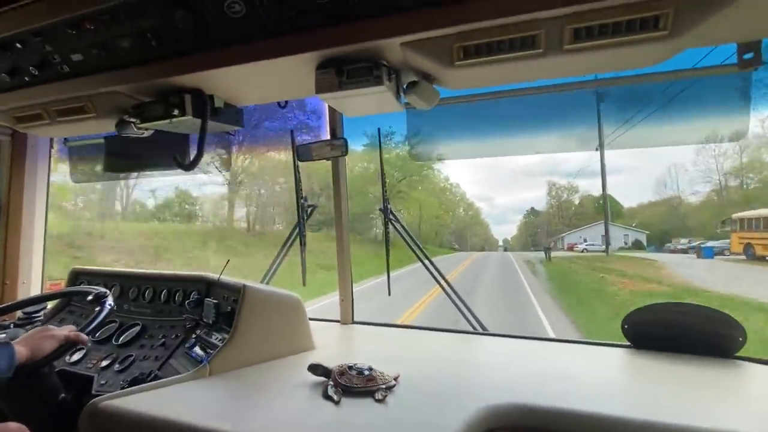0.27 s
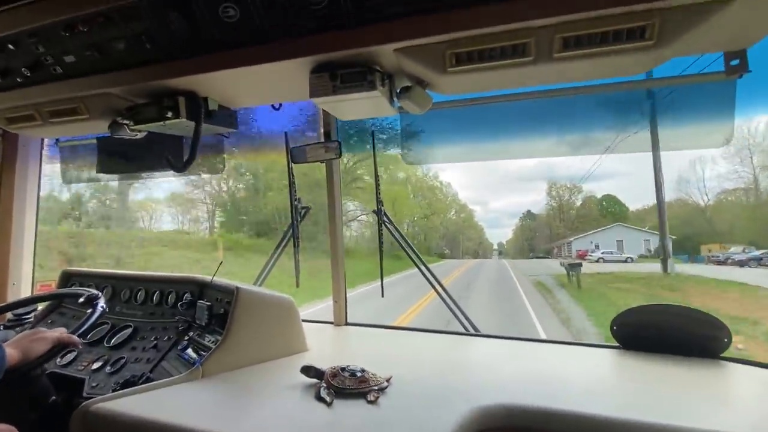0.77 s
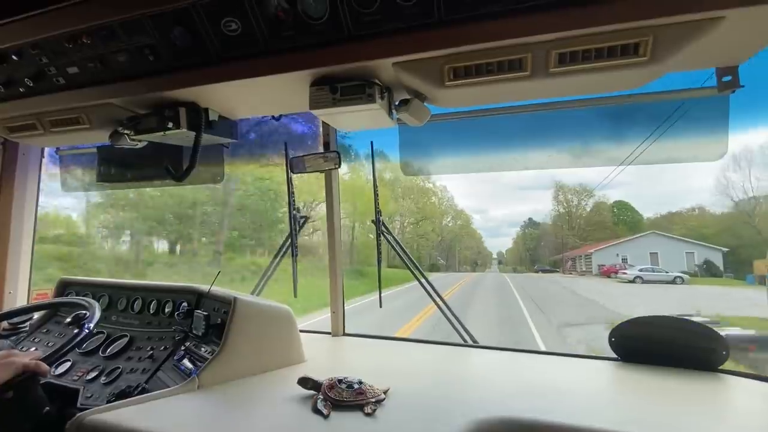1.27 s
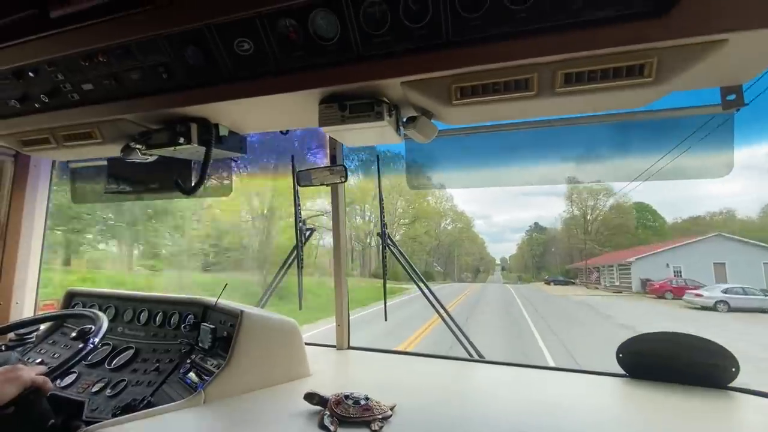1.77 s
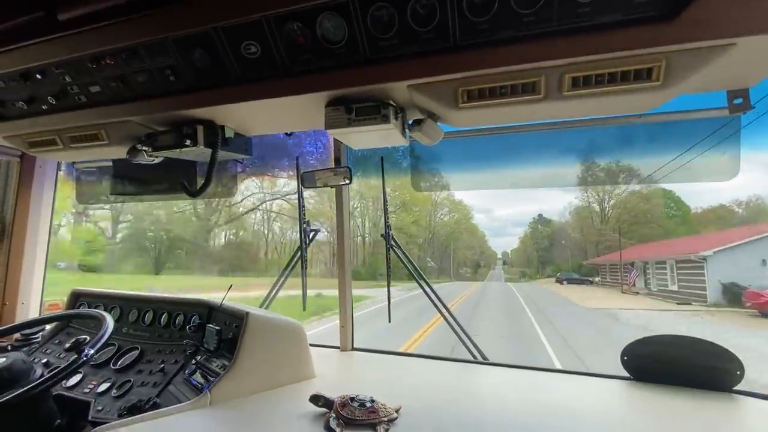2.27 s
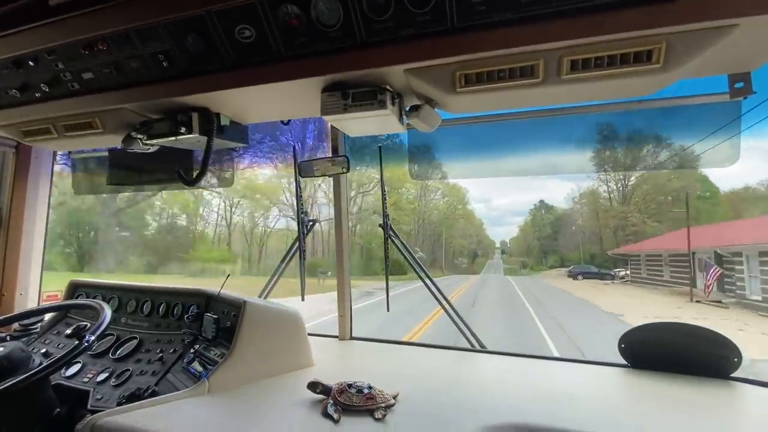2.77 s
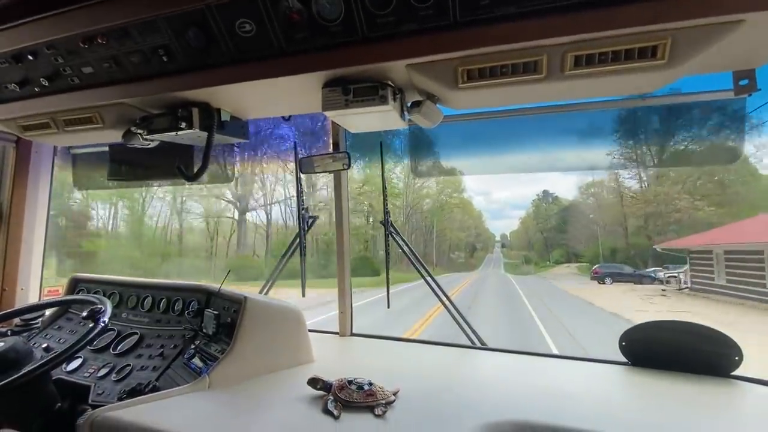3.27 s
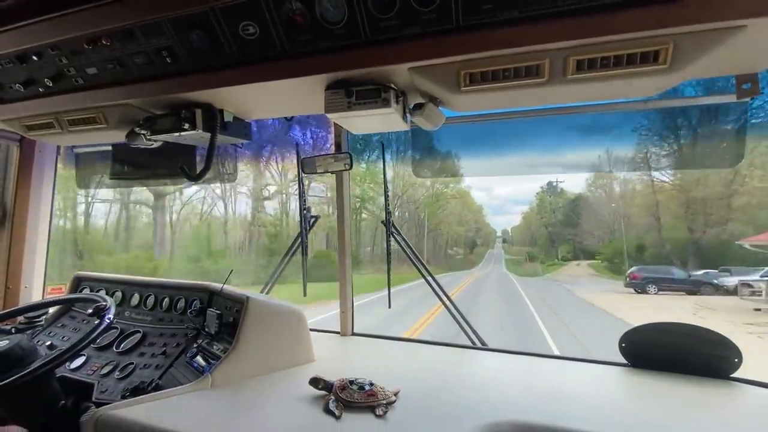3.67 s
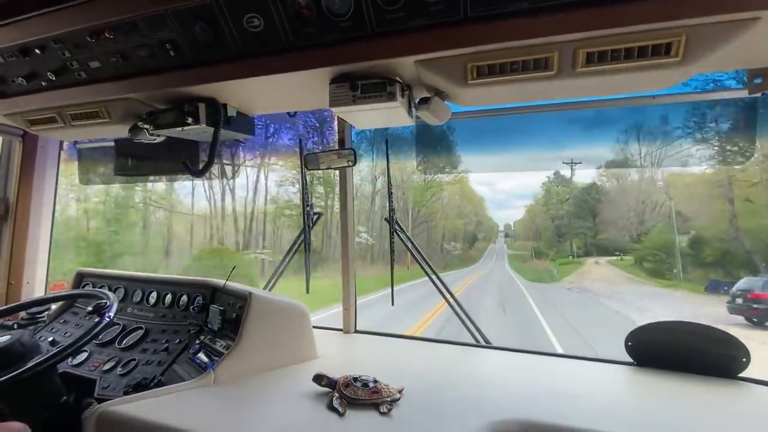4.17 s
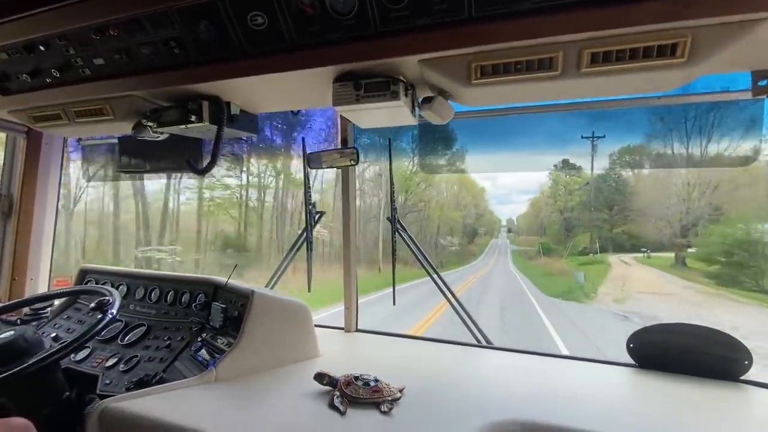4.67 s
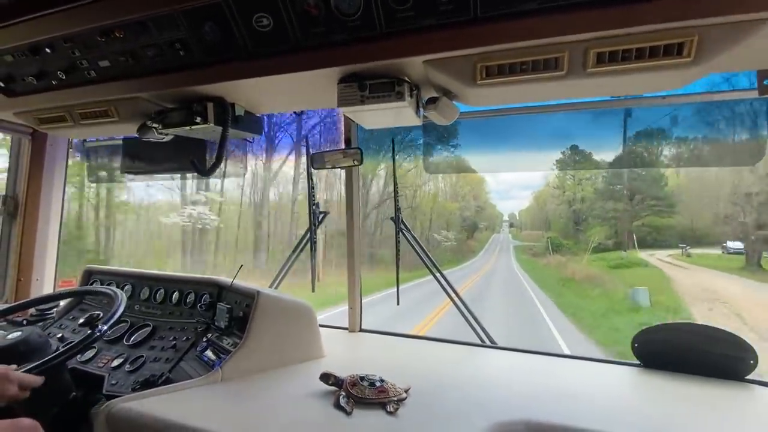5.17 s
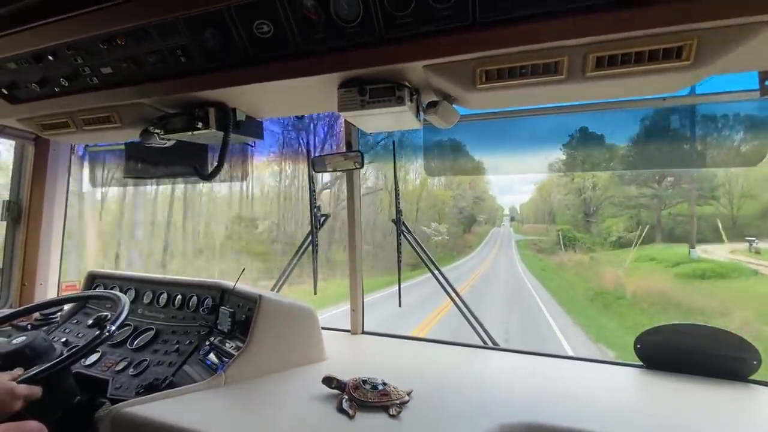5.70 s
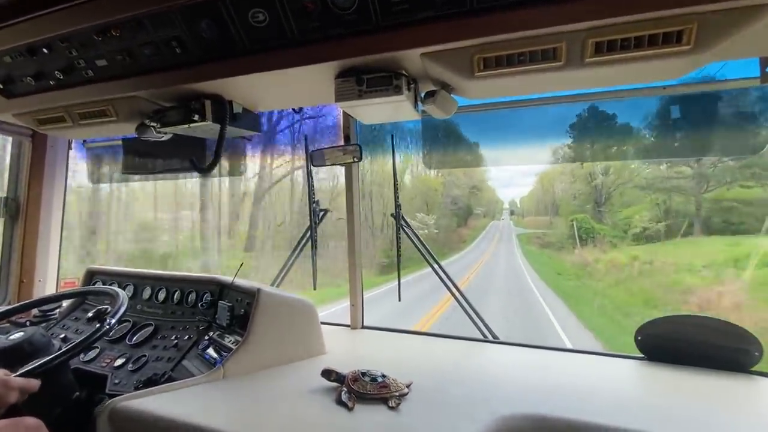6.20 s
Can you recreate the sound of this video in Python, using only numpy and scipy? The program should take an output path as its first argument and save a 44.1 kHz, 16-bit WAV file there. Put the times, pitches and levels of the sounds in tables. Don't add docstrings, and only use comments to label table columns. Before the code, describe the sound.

Heard from a single microphone in a coach's cab, a big diesel far behind drones low and nearly steady. Irregular road shocks boom through the body and floor rumble fills the space. Close by, wind hisses at the windshield while loose trim buzzes, ticks and rattles. Panels knock throughout, tiny rubber squeaks come mostly mid-way, a cluster of dull dashboard thuds lands past four and a half seconds, and heavier bumps come near the end.

```python
import sys
import numpy as np
from scipy import signal
from scipy.fft import rfft, irfft
from scipy.io import wavfile
from scipy.ndimage import uniform_filter1d

SR = 44100
rng = np.random.default_rng(int(sys.argv[2]) if len(sys.argv) > 2 else 0)


def wav_record(signal):
    frames = np.transpose(np.atleast_2d(signal))
    bounded = np.clip(frames, -1, 1)
    quanta = np.round(bounded * 32767).astype(np.int16)
    wavfile.write(sys.argv[1], SR, quanta)


def level_to_linear(level):
    exponent = np.asarray(level, float) / 20
    return 10 ** exponent


N = 284004
TIME = np.arange(N) / SR

# time_s, firing_hz, firing_rms_db
ENGINE = [(0.0, 114.9, -26.5), (0.45, 113.8, -27.5), (.7, 113.7, -22.5), (.93, 112.6, -23),
          (1.1, 112.2, -20.5), (1.5, 111, -20.5), (2.0, 110, -21), (2.9, 109, -22.5), (3.4, 108.4, -24.5),
          (3.55, 108.1, -30), (3.75, 109.4, -19.5), (4.0, 109, -24.5), (4.5, 109.5, -26.5),
          (5.1, 109.4, -23.5), (5.6, 110.7, -30), (5.75, 110.9, -25.5), (6.0, 111.1, -24.5),
          (6.44, 111.7, -23)]
# turns_per_crank_turn, rms_db at mean load, gain_db per dB of load,
# loss_db per squared Hz off the frame resonance
MAIN_ORDERS = [(5, -36.5, -0.1, -0.1), (10, -38.5, 0.16, 0.3), (3, -32, 0, 0.5)]
# turns_per_crank_turn, rms_db
WEAK_ORDERS = [(6, -45), (7, -47), (8, -45), (13, -51), (15, -58), (17, -62), (20, -54), (22.7, -62)]
MEAN_LOAD_DB, FRAME_FIRING_HZ = -24, 110

# centre_s, rms_db, half_length_s, ring_hz
SHOCKS = [(0.05, -25, .07, 65.9), (.27, -24.5, 0.092, 65.5), (.45, -27, 0.056, 70.4), (.68, -36, .08, 69.4),
          (.97, -26, 0.056, 72.2), (1.08, -22, 0.046, 74.35), (1.25, -22, .06, 73.5),
          (1.42, -26, .06, 71.8), (1.52, -23, 0.037, 69.7), (1.63, -21, 0.05, 73.8),
          (1.85, -23, 0.077, 71.7), (2.0, -26, 0.064, 78), (2.15, -26, 0.061, 74.05),
          (2.42, -20, 0.052, 70.2), (2.56, -24.5, 0.062, 74.15), (2.68, -27, .04, 70),
          (2.79, -23, 0.05, 68), (2.96, -22, 0.037, 69.9), (3.05, -21, 0.053, 69),
          (3.3, -21.5, 0.052, 68.6), (3.43, -23.5, .05, 70), (3.56, -36, .04, 68),
          (3.84, -22, 0.041, 72.26), (3.98, -27, .06, 66), (4.13, -25, 0.072, 67), (4.35, -24, .05, 71),
          (4.55, -27, .05, 72.7), (4.68, -24, .05, 66), (4.8, -27.5, .05, 67.6), (4.93, -28, .05, 70.5),
          (5.06, -23, 0.059, 68), (5.18, -30, 0.043, 68), (5.33, -31, .05, 71.8), (5.57, -16, .06, 69.2),
          (5.7, -23, .04, 74), (5.85, -26, .06, 69.94), (5.98, -27, .04, 72.14), (6.1, -22, 0.066, 70.9),
          (6.2, -26, .04, 72.03), (6.42, -18, 0.049, 72)]
# frequency_hz, density_db per Hz
BODY_HUMP = [(30, -24), (50, -11.5), (60, 1.5), (70, -9.5), (84, -5), (100, -2.5), (130, -63)]
# centre_s, rms_db, half_length_s, ring_hz
SWELLS = [(0.603, -44, .08, 329), (1.51, -31, 0.056, 272), (2.9, -37, 0.16, 267.2),
          (3.302, -31.5, 0.067, 168), (3.37, -32.5, 0.053, 215.2), (3.8, -38.5, 0.085, 270),
          (4.499, -34.5, .07, 212), (5.301, -31.5, 0.067, 221.7), (5.503, -34, 0.0793, 189.4),
          (5.72, -31.5, 0.11, 200), (6.149, -41, .07, 274.7), (6.267, -32, 0.083, 212), (.8, -40, .1, 200),
          (2.0, -27, .06, 86), (3.3, -44.5, 0.17, 500), (4.76, -37.5, 0.15, 270), (5.363, -23, .05, 84),
          (6.28, -18.5, 0.033, 83)]

# start_s, peak_db, ring_hz
KNOCKS = [(0.0307, -30, 1340), (0.1017, -43, 1510), (0.125, -40, 1170), (0.234, -29, 1220),
          (0.4464, -38, 1300), (1.2212, -28, 1110), (1.43, -34, 1173), (1.4731, -37, 1135),
          (2.1199, -34, 1276), (2.5235, -35, 1697), (2.686, -25.5, 2007), (2.863, -46, 1694),
          (3.6454, -31, 1405), (4.2407, -37, 1180), (4.521, -33, 1640), (5.3843, -24.5, 2040),
          (5.492, -26, 1760), (5.5686, -35, 1597), (5.678, -29, 2145), (5.881, -30, 1630),
          (6.1417, -35, 1437), (6.2106, -28, 1119)]
# start_s, peak_db, ring_hz
TAPS = [(0.1306, -28, 3110), (0.3834, -33, 3240), (0.5364, -29, 3360), (0.6402, -29, 2410),
        (0.7721, -29, 3070), (0.8579, -37, 3030), (0.9542, -38, 2670), (1.0276, -35, 3490),
        (1.2324, -29, 3100), (1.6661, -33, 3610), (1.9714, -43, 2750), (2.2109, -34, 2820),
        (2.2843, -35, 3090), (2.361, -28, 3150), (2.44, -29, 3170), (2.5212, -26.5, 2790),
        (2.7337, -29, 2833), (2.804, -27.5, 2820), (2.8773, -30.5, 3100), (3.468, -32, 3080),
        (3.5428, -40, 3152), (3.619, -36, 2790), (3.8374, -33, 2900), (4.364, -37, 3600),
        (4.4513, -38, 2620), (4.7249, -29, 2790), (4.804, -26, 2813), (4.8781, -29, 2880),
        (4.9589, -34, 3170), (5.037, -34, 2980), (5.2025, -31, 2400), (5.4179, -30, 2810),
        (5.489, -25, 3060), (5.5448, -32, 3090), (6.0614, -35, 2480), (6.1402, -34, 3015),
        (6.216, -28, 2730), (6.352, -31, 3036)]
# start_s, peak_db, ring_hz, t60_s
THUDS = [
    (1.29, -31, 1296, 0.1),
    (2.38, -35, 1106, .1),
    (4.62, -26, 450, .06),
    (4.65, -23, 200, .1),
    (4.703, -19, 150, .1),
    (4.618, -28, 805, .06),
    (4.645, -29, 800, .05),
    (4.68, -23, 383, 0.06),
    (4.681, -26, 800, .06),
]

# start_s, chatter_rms_db, chatter_length_s, click_db
TICKS = [(0.121, -48, .013, -42), (0.295, -46, .012, -39), (0.376, -46, 0.011, -39),
         (0.578, -49, .021, -44), (0.606, -47, .012, -37), (0.638, -48, .024, -37),
         (0.729, -48.5, .014, -40), (1.087, -49, .005, -36), (1.225, -43, 0.018, -36),
         (1.34, -43, 0.025, -36), (1.657, -48, 0.014, -40), (1.799, -48, 0.011, -40),
         (1.87, -49, 0.027, -45), (2.385, -50, .01, -42), (2.686, -50, 0.016, -43),
         (3.841, -47.5, 0.026, -39), (3.885, -49, 0.0057, -32), (4.056, -50.5, 0.015, -40),
         (4.079, -53, .006, -35), (4.241, -45.5, .01, -32), (4.597, -46, .022, -38),
         (4.63, -46, 0.021, -38), (4.657, -46.5, 0.022, -40), (4.694, -48, .019, -42),
         (5.268, -46, 0.027, -38), (5.371, -46, .028, -38), (5.736, -48, 0.011, -34),
         (5.88, -48, 0.023, -38), (6.205, -48, 0.027, -27), (6.261, -50, 0.02, -44),
         (5.288, -52, .006, -36), (5.914, -50, .006, -35), (2.52, -49, .014, -39), (2.594, -50, .007, -38),
         (5.2, -50, .012, -41), (4.855, -50, .011, -42)]
# start_s, peak_db, chatter_length_s
RATTLES = [(0.034, -31.5, 0.008), (0.0837, -39, 0.008), (0.158, -36, 0.008), (0.185, -32, 0.0067),
           (0.2139, -34, 0.008), (0.2344, -33, 0.008), (0.25, -35, 0.008), (0.2718, -33, 0.008),
           (0.5182, -38, 0.008), (0.6894, -36, 0.008), (0.7734, -37, 0.0073), (1.02, -45, 0.008),
           (1.413, -41, 0.008), (1.4426, -38, 0.008), (1.6067, -35, 0.0075), (1.7, -36, 0.008),
           (1.77, -37, 0.008), (2.216, -38, 0.008), (2.3117, -34, 0.0087), (2.368, -34, 0.008),
           (2.44, -37, 0.008), (2.4902, -39, 0.008), (2.613, -45, 0.0087), (2.7262, -36, 0.008),
           (2.808, -37, 0.0081), (2.9744, -40, 0.0088), (3.2301, -39, 0.0084), (3.2734, -40, 0.008),
           (3.343, -36, 0.008), (3.384, -36, 0.0086), (3.3996, -40, 0.008), (3.4494, -42, 0.008),
           (3.5952, -37, 0.0074), (3.6174, -36, 0.008), (3.6706, -35, 0.008), (3.7973, -39, 0.0074),
           (3.909, -39, 0.008), (3.999, -49, 0.008), (4.1187, -37, 0.0085), (4.1315, -43, 0.008),
           (4.316, -36, 0.0074), (4.3454, -38, 0.008), (4.471, -38, 0.0081), (4.492, -37, 0.0074),
           (4.579, -35, 0.008), (4.7394, -34, 0.008), (4.8084, -39, 0.008), (4.9064, -42, 0.0074),
           (4.9554, -39, 0.008), (5.356, -40, 0.0072), (5.409, -32, 0.008), (5.436, -35, 0.008),
           (5.4915, -35, 0.0083), (5.6516, -37, 0.008), (5.8207, -33, 0.008), (6.0864, -43, 0.0077),
           (6.139, -37, 0.008), (6.3804, -35, 0.0078)]
# frequency_hz, level_db, t60_s
TRIM_MODES = [(7150, -3, .07), (8100, -6, .05), (8600, -8, .05), (9700, -7, .05), (10700, -8, .05),
              (12500, -4, .06), (13650, -3, .05), (14200, -7, .04)]
# frequency_hz, gain_db
TICK_COLOUR = [(1200, -30), (2500, -6), (5000, -1), (7500, -1), (11000, -2), (14000, 1),
               (14900, -3), (15400, -9), (16500, -20)]

# start_s, length_s, pitch_hz, rms_db, octave_rms_db
SQUEAKS = [
    (2.805, 0.035, 5370, -51, -59),
    (3.174, 0.036, 5370, -53, -53),
    (3.215, 0.018, 5380, -62, -61),
    (3.342, 0.0462, 5310, -46, -51),
    (2.41, 0.035, 5370, -52, -62),
    (4.375, .02, 5300, -60, -58),
    (4.215, 0.023, 5370, -53, -59),
    (5.454, 0.0293, 5260, -58, -57.5),
    (5.535, 0.024, 5280, -56, -56),
    (6.234, 0.023, 5320, -56, -58),
]

# time_s, wind_rms_db
RIDE = [(0.0, -33), (0.05, -37), (0.2, -36), (1.92, -37.5), (2.73, -37), (2.92, -38.5), (4.46, -37),
        (4.55, -38.5), (4.68, -35), (4.75, -36.5), (6.13, -36), (6.3, -33.5), (6.33, -36.5), (6.44, -35)]
MEAN_RIDE_DB = -38
# frequency_hz, density_db per Hz
RUMBLE = [(22, -46), (35, -36), (55, -3.5), (75, -1.5), (110, 0.5), (150, -4.5), (215, -5.5), (250, -7),
          (330, -10.5), (450, -16.5), (700, -26.5), (1100, -31.5), (2000, -34.5)]
# frequency_hz, width_hz, level_db
FLOOR_MODES = [(117.2, 3.3, -1.5), (181.4, 14, -6), (197.9, 3.3, 1.5), (213.2, 4.9, -3),
               (270.8, 10.5, -4.5), (312.8, 9.2, -4), (358, 7.5, -12.5), (418, 11, -18), (478, 6.9, -13.5),
               (537, 11, -13.5), (629, 19, -18)]
# frequency_hz, density_db per Hz
WIND = [(290, -15), (500, -3), (668, -5), (1140, -7), (1260, -8.5), (1750, -7.5), (2630, -9.5), (3720, -9),
        (4860, -14), (8000, -35.5), (10400, -52), (17600, -120)]
# frequency_hz, density_db per Hz
BUZZ = [(3500, -7.5), (5500, -0.5), (7800, -12.5), (10000, -9.5), (12000, -8), (13800, -8.5), (14700, -7.5),
        (15200, -12), (15600, -18), (16000, -22)]


def unit(x):
    return x / np.sqrt(np.mean(x ** 2))


def columns(table):
    s, *values = np.transpose(table)
    return [np.interp(TIME, s, v) for v in values]


def walk(rate):
    k = int(SR / rate)
    held = np.repeat(rng.standard_normal(N // k + 1), k)[:N]
    return unit(uniform_filter1d(uniform_filter1d(held, k), k))


def tone(hz):
    return np.sqrt(2) * np.sin(2 * np.pi * np.cumsum(hz) / SR)


def coloured(x, points):
    hz, db = np.transpose(points)
    f = np.arange(N // 2 + 1) * SR / N + 1
    gain_db = np.interp(np.log(f), np.log(hz), db, left=-120, right=-120)
    return irfft(rfft(x) * level_to_linear(gain_db), N)


def patchy(points, lo_hz, hi_hz, shared_db, own_db, rate):
    spectrum = rfft(coloured(rng.standard_normal(N), points))
    octave = np.log2(np.arange(N // 2 + 1) * SR / N + 1)
    shared = shared_db * walk(rate)
    out = 0
    for centre in np.arange(np.log2(lo_hz), np.log2(hi_hz), .5):
        band = irfft(spectrum * np.clip(1 - 2 * abs(octave - centre), 0, 1), N)
        out = out + band * level_to_linear(shared + own_db * walk(rate))
    return unit(out)


def resonant(x, modes):
    f = np.arange(N // 2 + 1) * SR / N
    gain = sum(level_to_linear(db) / (1 + ((f - hz) / width) ** 2) for hz, width, db in modes)
    return unit(irfft(rfft(x) * gain, N))


def ring(t, hz, t60):
    return np.sin(2 * np.pi * hz * t) * level_to_linear(-60 * t / t60)


def add(out, s, sound):
    i = int(s * SR)
    out[i:i + len(sound)] += sound[:N - i]


def engine():
    firing_hz, firing_db = columns(ENGINE)
    crank = 2 * np.pi * np.cumsum(firing_hz) / SR / 4
    load = firing_db - MEAN_LOAD_DB
    off_resonance = firing_hz - FRAME_FIRING_HZ
    orders = [(4, firing_db, 1.0)]
    for order, db, per_db, per_hz in MAIN_ORDERS:
        orders.append((order, db + per_db * load - per_hz * off_resonance ** 2, 1.8))
    orders += [(order, db, 1.8) for order, db in WEAK_ORDERS]
    out = 0
    for order, db, waver_db in orders:
        level = level_to_linear(db + waver_db * walk(11))
        out = out + level * np.sin(order * crank + rng.uniform(0, 2 * np.pi) + .2 * walk(7))
    return np.sqrt(2) * out


def body_boom():
    power = level_to_linear(2 * -37)
    for s, db, half, _ in SHOCKS:
        power = power + level_to_linear(2 * db) * np.exp(-((TIME - s) / half) ** 2)
    boom_db = 10 * np.log10(power)
    ring_hz = columns(SHOCKS)[-1]
    mode = tone(ring_hz + 0.78 * walk(10)) * level_to_linear(0.6 * walk(9.9))
    hump = unit(coloured(rng.standard_normal(N), BODY_HUMP))
    hump_db = -30.5 + 0.5 * (boom_db + 26)
    return level_to_linear(boom_db - 1.0) * mode + level_to_linear(hump_db) * hump


def floor_swells():
    out = 0
    for s, db, half, hz in SWELLS:
        swell = np.exp(-.5 * ((TIME - s) / half) ** 2)
        out = out + level_to_linear(db) * swell * tone(hz + 2.98 * walk(15))
    return out


def knock(peak_db, t, hz, t60, contact_s):
    rings = ring(t, hz, t60)
    for ratio in rng.uniform(.8, 1.25, 9):
        rings = rings + .45 * ring(t, hz * ratio, .5 * t60)
    n = SR // 30
    contact = rng.standard_normal(n) * np.exp(-TIME[:n] / contact_s)
    sound = signal.fftconvolve(rings, contact)[:len(t)]
    return level_to_linear(peak_db) * sound / abs(sound).max()


def knocks():
    out, t = np.zeros(N), TIME[:SR // 4]
    for s, db, hz in KNOCKS:
        add(out, s, knock(db - 3.0, t, hz, t60=.05, contact_s=0.015))
    for s, db, hz in TAPS:
        add(out, s, knock(db - .5, t, hz, t60=.035, contact_s=0.0087))
    for s, db, hz, t60 in THUDS:
        add(out, s, knock(db, t, hz, t60, contact_s=0.013))
    return out


def rattles():
    return [(s, db - 14.5, length, db - 8) for s, db, length in RATTLES]


def trim_body(t):
    colour = rng.standard_normal((len(TRIM_MODES), 2))
    body = 0
    for (hz, db, t60), (level, pitch) in zip(TRIM_MODES, colour):
        body = body + level_to_linear(db + 2 * level) * ring(t, hz * (1 + .01 * pitch), .5 * t60)
    return body


def ticks():
    out, t = np.zeros(N), TIME[:SR // 10]
    n = len(t)
    for s, chatter_db, length, click_db in TICKS + rattles():
        grit_db = 3.0 * rng.standard_normal(n // 64 + 1).repeat(64)[:n]
        grit = unit(rng.standard_normal(n) * level_to_linear(grit_db))
        click = rng.standard_normal(n) * np.exp(-t / 0.00044)
        click *= level_to_linear(click_db + 14) / np.sqrt(np.sum(click ** 2))
        fade = level_to_linear(-60 * np.maximum(t - 0.77 * length, 0) / 0.055)
        touch = click + level_to_linear(chatter_db + 5.5) * grit * fade
        ringing = signal.fftconvolve(touch, trim_body(t))[:n]
        add(out, s, touch + level_to_linear(-30) * ringing)
    return coloured(out, TICK_COLOUR)


def squeaks():
    out = np.zeros(N)
    stutter = level_to_linear(3.5 + 3 * walk(180))
    wobble = 1 + .006 * walk(220)
    for s, length, hz, db, octave_db in SQUEAKS:
        i, n = int(s * SR), int(length * SR)
        fall = 0.47 * (TIME[:n] - length / 2)
        phase = 2 * np.pi * hz * np.cumsum(wobble[i:i + n] - fall) / SR
        voice = level_to_linear(db) * np.sin(phase) + level_to_linear(octave_db) * np.sin(2 * phase)
        add(out, s, np.sqrt(2) * np.hanning(n) ** .5 * stutter[i:i + n] * voice)
    return out


def floor_rumble():
    wind_db, = columns(RIDE)
    rumble_db = -29 + 0.62 * (wind_db - MEAN_RIDE_DB) + 0.75 * walk(5.7)
    panels = 0
    for hz, width, db in FLOOR_MODES:
        panel = resonant(rng.standard_normal(N), [(hz, width / 2, 0)])
        panels = panels + level_to_linear(db + 1.66 * walk(4.8)) * panel
    floor = patchy(RUMBLE, 14.8, 2500, shared_db=0.17, own_db=0.37, rate=9)
    return level_to_linear(rumble_db + 2.0) * (floor + level_to_linear(-8.5) * unit(panels))


def wind():
    wind_db, = columns(RIDE)
    return level_to_linear(wind_db - 0.73) * patchy(WIND, 384, 10000, shared_db=0.45, own_db=0.74, rate=12)


def trim_buzz():
    wind_db, = columns(RIDE)
    buzz_db = -52 + 0.82 * (wind_db - MEAN_RIDE_DB)
    buzz = patchy(BUZZ, 3500, 20000, shared_db=1.1, own_db=.5, rate=45)
    hum = resonant(buzz, [(hz, 85., db) for hz, db, _ in TRIM_MODES])
    return level_to_linear(buzz_db - .5) * (buzz + level_to_linear(-12.5) * hum)


def monitor_whine():
    return level_to_linear(-77) * np.sqrt(2) * np.sin(2 * np.pi * 15734 * TIME)


def scene():
    struck = knocks() + ticks() + squeaks()
    background = floor_rumble() + wind() + trim_buzz() + monitor_whine()
    return (engine() + body_boom() + floor_swells() + struck + background)[None]


def roll_off(x):
    return signal.sosfilt(signal.butter(12, 15760, fs=SR, output="sos"), x)


def record(dry):
    return roll_off(dry)


dry = scene()
out = record(dry)
wav_record(out)
```